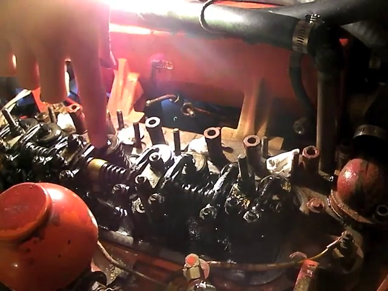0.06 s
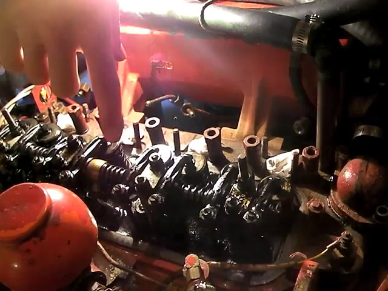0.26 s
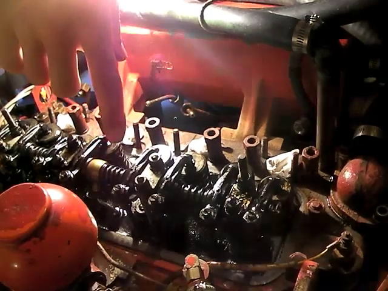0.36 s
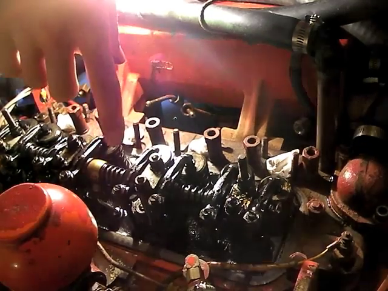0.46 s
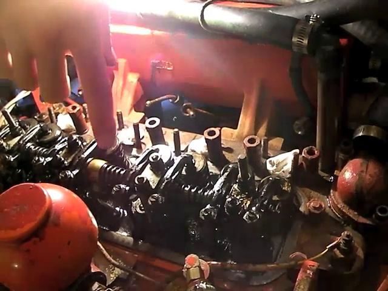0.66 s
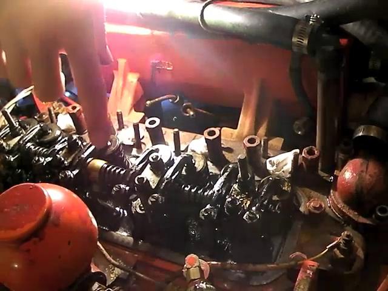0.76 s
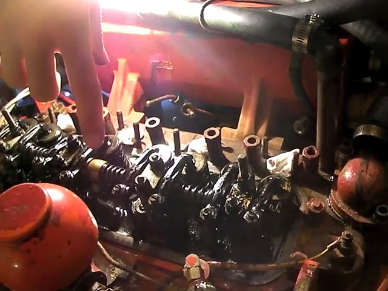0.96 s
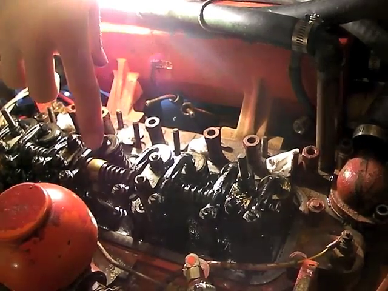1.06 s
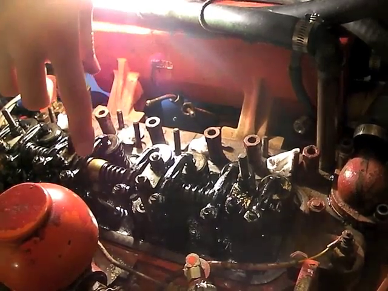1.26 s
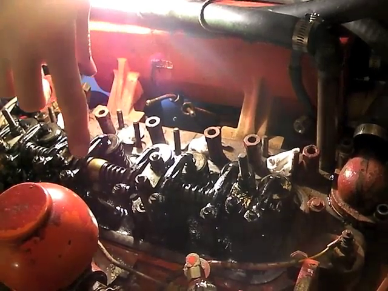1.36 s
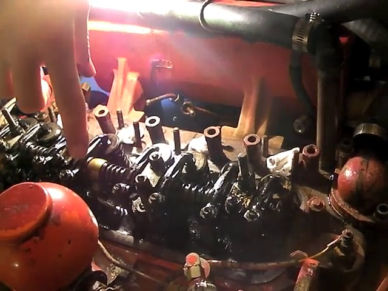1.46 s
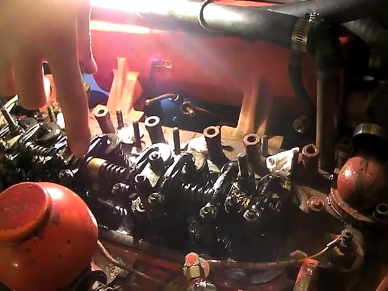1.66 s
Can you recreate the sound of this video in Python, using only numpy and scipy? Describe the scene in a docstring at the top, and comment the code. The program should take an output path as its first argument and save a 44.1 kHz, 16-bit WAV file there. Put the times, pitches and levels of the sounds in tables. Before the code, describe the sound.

A steel rocker arm clacks close by at about 0.2 seconds, then gives three loud, bright, quick pings between 0.3 and 0.5 seconds. It clacks back in a short cluster around 0.6 seconds, with a soft rub. Lighter clicks follow from 0.9 to 1.6 seconds, the clearest at 1.4, with a faint fluttering squeak near 1.5. The cramped engine space hums very faintly underneath.

```python
"""In the cramped engine space of a boat, a finger rocks a steel rocker arm on the stopped engine.
The arm clacks over onto the valve gear, pings three times against its stop, clacks back and is nudged
once more. Each contact rings the steel, and nearby iron and the room answer. The hand rubs, something
squeaks and the room hums faintly. A camera close by ducks and limits the loudest hits."""
import sys
import numpy as np
from scipy import signal
from scipy.fft import rfft, irfft, next_fast_len
from scipy.io import wavfile
from scipy.ndimage import uniform_filter1d, minimum_filter1d, map_coordinates

SR = 44100
rng = np.random.default_rng(int(sys.argv[2]) if len(sys.argv) > 2 else 0)


def materialize(psi):
    """Save the field psi as 16-bit PCM at rate SR to the path in sys.argv[1].

    A 1-D psi becomes a single channel; in a 2-D psi each row is a channel.
    """
    bounded = np.clip(np.atleast_2d(psi).T, -1, 1)
    quanta = np.round(bounded * 32767).astype(np.int16)
    wavfile.write(sys.argv[1], SR, quanta)


N = 74970
TIME = np.arange(N) / SR
HIT_SAMPLES = 10240
HIT_TIME, HIT_HZ = np.arange(HIT_SAMPLES) / SR, np.fft.rfftfreq(HIT_SAMPLES, 1 / SR)


def pings(strike_db=33, ring_db=3, snap_db=-3, snap_t60_s=0.012):
    """The arm snaps against its stop and rings high."""
    # light, bright contacts: start_s, level_db, low_db, upper_db, ring_db, bite_db
    contacts = [(.3361, -2, -0.5, 2, 2.5, -29.5), (0.4197, -2, -5.5, -1, -0.5, -20.5),
                (0.5164, -1.5, 0.5, 5, -3, -18.5)]
    # the arm's resonances: centre_hz, width_hz, level_db
    arm_modes = [(3680, 220, -19), (5000, 400, -29), (6630, 260, -15), (7080, 250, -20), (9480, 380, 3),
                 (9900, 300, -7), (10820, 350, -11), (11900, 400, -26), (14620, 280, -10)]
    # the broad crack under them: frequency_hz, level_db
    crack = [(60, -51), (1500, -45.5), (2300, -43), (3200, -34), (4400, -30), (7000, -22.5), (9000, -36),
             (13000, -25), (15000, -34.5)]
    # the arm's lasting partials: pitch_hz, level_db, t60_s
    arm_ring = [(6640, -42, .18), (9235, -29, .18), (9297, -29, .18), (9407, -23, .18), (9573, -24, .18),
                (9706, -25, .17), (9922, -29, .18), (10838, -36, .18)]
    # its quickly damped partials: pitch_hz, level_db, t60_s
    arm_bite = [(3170, 7.5, 0.0052), (3690, 5, 0.017), (5350, -11.5, .02)]
    upper_band = np.clip((HIT_HZ - 10000) / 700, 0, 1)
    out = np.zeros((2, N))
    for start_s, level_db, low_db, upper_db, ring_trim_db, bite_db in contacts:
        tilt_db = low_db * (0.5 - above(HIT_HZ, 4600)) + upper_db * upper_band
        colour = body(arm_modes, crack) * amp(tilt_db)
        strike = amp(strike_db) * irfft(engine_space(rise_s=.0002, direct_db=-5) * causal(colour))
        sustain = amp(ring_db + ring_trim_db) * ring(arm_ring)
        burst = rng.standard_normal((2, HIT_SAMPLES)) * amp(snap_db - 60 * HIT_TIME / snap_t60_s)
        snap = irfft(rfft(burst) * causal(above(HIT_HZ, 8000)))
        bite = amp(bite_db) * ring(arm_bite)
        add(out, start_s, amp(level_db) * (strike + sustain + snap + bite))
    return out


def clacks(strike_db=29, ring_db=7, bite_db=6):
    """The arm lands on the valve gear and shakes the whole cylinder head."""
    # heavy contacts: start_s, level_db, thud_db, treble_db, main_hz, low_hz, low_db, bite_db, rise_s
    contacts = [(.2320, -9.5, -7, -2.5, 7136, 1060, 13, -14, 0.001),
                (.2982, -39.5, -6, 19, 7100, 1030, 11, -24, 0.00033),
                (.314, -37.5, -4.5, 9.5, 7560, 1020, 2, -15, 0.0013),
                (0.5788, -16, -3, -10, 6900, 930, -25, -11.5, 0.0012),
                (0.6069, -8.5, 1.5, 4, 6690, 737, 2, 1, 0.0018),
                (0.6605, -22.5, 5.5, -7, 6940, 1120, 3.5, -4, .002),
                (0.836, -37, -24, -28.5, 6980, 760, -3, -38, 0.00036),
                (0.944, -52, 10.5, -19, 3970, 758, -1.5, 2, 0.0011),
                (1.2282, -42.5, -10.5, -4.5, 3980, 900, 6, 0, 0.00066),
                (1.268, -39.5, 8.5, 1.5, 7050, 1520, 2, -24, .0003),
                (1.3987, -26.5, -5, -2, 7030, 1200, 6.5, -31, 0.00021),
                (1.4028, -20, -16, -6, 6990, 1200, 1, -42.5, 0.00025),
                (1.44, -47, 16, -9.5, 3580, 1200, 3, 2.5, 0.00081),
                (1.5958, -64, 25.5, -2, 3030, 780, 13, -8, 0.00094)]
    # resonances of valve gear and head: centre_hz, width_hz, level_db
    head_modes = [(1450, 150, -12), (2540, 240, -4), (3250, 350, -9), (3950, 280, -1), (5150, 300, -6),
                  (9450, 700, -1), (10850, 350, 1), (12400, 600, -12), (14700, 400, -5)]
    # the broad crack under them: frequency_hz, level_db
    crack = [(50, -50.5), (200, -42.5), (500, -16.5), (1000, -30.5), (1700, -10), (3000, -19), (6300, -8.5),
             (9000, -17.5), (12000, -29), (15000, -15)]
    # the head's lasting partials: pitch_hz, level_db, t60_s
    head_ring = [(756.4, -42, 0.36), (1046, -41.5, 0.28), (1445, -40, 0.23), (2417, -48, 0.171),
                 (3860, -45, .2), (4040, -41, 0.12), (4210, -34.5, .2), (5170, -29.5, .08),
                 (6630, -32.5, 0.075)]
    # dull steel-on-steel bite at the instant of contact: pitch_hz, level_db, t60_s
    steel_bite = [(2517, -13.5, 0.039), (3100, -7, 0.024), (3350, -4, 0.012), (3710, -5.5, 0.018)]
    top_band = np.clip((HIT_HZ - 11000) / 2000, 0, 1)
    out = np.zeros((2, N))
    for start_s, level_db, thud_db, treble_db, main_hz, low_hz, low_db, bite_trim_db, rise_s in contacts:
        modes = list(head_modes) + [(main_hz, 240, 9), (low_hz, 170, low_db - 13.5)]
        tilt_db = thud_db * (1 - above(HIT_HZ, 2200)) + treble_db * above(HIT_HZ, 8500)
        dull_db = 0.226 * max(level_db + 7.5, -25) * top_band  # weaker blows lose top treble
        colour = body(modes, crack) * amp(tilt_db + dull_db)
        strike = amp(strike_db) * irfft(engine_space(rise_s, direct_db=-13.5) * causal(colour))
        sustain = amp(ring_db + thud_db) * ring(head_ring)
        bite = amp(bite_db + bite_trim_db) * ring(steel_bite)
        add(out, start_s, amp(level_db) * (strike + sustain + bite))
    return out


def body(modes, crack):
    """The gain curve of struck steel: steep-sided resonances over a broad crack."""
    peak_power = sum(amp(db) ** 2 / (1 + ((HIT_HZ - hz) / width) ** 2) ** 2 for hz, width, db in modes)
    return np.sqrt(peak_power + amp(along(crack, HIT_HZ)) ** 2)


def ring(partials, rise_s=0.00095):
    """Steel ringing out: two sets of the same decaying partials, with unrelated phases."""
    tones = sum(amp(db - 60 * HIT_TIME / t60) * np.sin(2 * np.pi * (hz * HIT_TIME + rng.random((2, 1))))
                for hz, db, t60 in partials)
    return tones * (1 - np.exp(-HIT_TIME / rise_s))


def engine_space(rise_s, direct_db, iron_hold_s=0.0017, iron_t60_s=0.032):
    """Mid and side spectra of a contact arriving direct, off nearby iron, then from the room."""
    # decay of the room's tail: frequency_hz, t60_s
    tail_t60 = [(200, 0.9), (800, 0.17), (3000, 0.14), (7000, 0.15), (10000, 0.13), (15000, 0.11)]
    # the tail's starting colour: frequency_hz, level_db
    tail_colour = [(200, -16.5), (900, -2.5), (3000, -5), (7000, -12), (10000, -7.5), (15000, -14.5)]
    iron_fade_db = -60 * np.maximum(HIT_TIME - iron_hold_s, 0) / iron_t60_s
    iron = rng.standard_normal((2, HIT_SAMPLES)) * amp(iron_fade_db)
    hz, t, bands = signal.stft(rng.standard_normal((2, HIT_SAMPLES)), SR, nperseg=256)
    tail_fade_db = along(tail_colour, hz)[:, None] - 60 * t / along(tail_t60, hz)[:, None]
    tail = signal.istft(bands * amp(tail_fade_db), SR, nperseg=256)[1][:, :HIT_SAMPLES]
    pair = (iron + tail) * (1 - np.exp(-HIT_TIME / rise_s))
    pair[0, 0] += amp(direct_db) * np.linalg.norm(pair[0])  # direct click, mid only
    power = uniform_filter1d(abs(rfft(pair)) ** 2, size=101, axis=1)
    return rfft(pair) * [causal(p ** -.5) for p in power]  # even out the overall colour


def rubs(grain_db=1.5):
    """Soft, grainy swells as the hand and oily steel slide."""
    # slides: centre_s, half_length_s, level_db, treble_db
    slides = [(0.027, 0.006, -53, -18), (0.087, 0.022, -63, -11), (0.213, 0.008, -49, 16),
              (0.571, 0.019, -34, 16), (0.766, 0.033, -53.5, 13.5), (0.998, 0.032, -53, 9.5),
              (1.254, 0.036, -52, 7.5), (1.626, 0.028, -52.5, 12)]
    # colour of the friction: frequency_hz, level_db
    colour = [(100, -42), (400, -0.5), (850, 5.5), (1500, -6), (4000, -12.5), (7000, -12), (10000, -11.5),
              (14500, -18.5)]
    out = np.zeros((2, N))
    for centre_s, half_s, level_db, treble_db in slides:
        swell = amp(level_db + grain_db * wobble(220)) * np.exp(-((TIME - centre_s) / half_s) ** 2 / 2)
        out += swell * noise(lambda hz: along(colour, hz) + treble_db * above(hz, 2700))
    return out


def squeak(jitter=.022, flutter_hz=56, flutter_depth=.55):
    """A faint, fluttering squeak around the last nudge."""
    # the squeak's contour: time_s, pitch_hz, level_db
    contour = [(1.30, 1180, -75), (1.35, 1200, -65.5), (1.42, 1170, -69), (1.50, 1215, -55.5),
               (1.56, 1195, -59.5), (1.60, 1230, -59.5), (1.63, 1220, -76.5)]
    time_s, pitch_hz, level_db = np.transpose(contour)
    pitch = np.interp(TIME, time_s, pitch_hz) * (1 + jitter * wobble(83))
    flutter = 1 + flutter_depth * sine(flutter_hz * (1 + .2 * wobble(22)))
    envelope = amp(np.interp(TIME, time_s, level_db, left=-120, right=-120))
    return envelope * flutter * np.sqrt(2) * sine(pitch)


def room_tone(air_db=-57.5, waver_hz=4, waver_db=2):
    """Still air with a faint, wavering hum."""
    # tones of the hum: pitch_hz, level_db
    tones = [(150, -75.5), (172, -76.5), (473, -70.5), (760, -79)]
    # colour of the air: frequency_hz, level_db
    air_colour = [(20, -16.5), (45, -15.5), (80, -6), (160, -2), (235, -14.5), (320, -4), (470, -5),
                  (700, -4), (1050, -11), (1400, -12), (2500, -14), (6500, -14), (9500, -14), (14500, -17)]
    hum = sum(amp(db + waver_db * wobble(27)) * np.sqrt(2) * sine(hz + waver_hz * wobble(5.8))
              for hz, db in tones)
    return amp(air_db) * noise(lambda hz: along(air_colour, hz)) + hum


def noise(colour_db):
    """Coloured stereo noise of rms 1, wider toward the treble."""
    # stereo image of the noise: frequency_hz, left_right_likeness
    likeness = [(100, .8), (700, 0.76), (1400, 0.65), (4000, .35), (9000, .05)]
    pair = filtered(rng.standard_normal((2, N)), lambda hz: amp(colour_db(hz)))
    stereo = spread(pair, likeness)
    return stereo / np.sqrt(np.mean(stereo ** 2) + 1e-20)


def amp(db):
    """Decibels to gain."""
    return 10 ** (np.asarray(db) / 20)


def along(points, hz):
    """A curve through (frequency_hz, value) points on a log axis."""
    frequencies, values = np.transpose(points)
    return np.interp(np.log(hz + 1), np.log(frequencies + 1), values)


def above(hz, edge_hz):
    """A smooth step from 0 to 1 around an edge."""
    return hz ** 4 / (hz ** 4 + edge_hz ** 4)


def wobble(knots_per_s):
    """A smooth random curve."""
    return map_coordinates(rng.standard_normal(1024), [TIME * knots_per_s], mode="mirror")


def sine(hz):
    """A sine that follows a frequency curve."""
    return np.sin(2 * np.pi * np.cumsum(hz) / SR)


def filtered(x, response):
    """Equalise x with a gain given as a function of frequency."""
    size = next_fast_len(x.shape[-1] + HIT_SAMPLES)
    return irfft(rfft(x, size) * response(np.fft.rfftfreq(size, 1 / SR)), size)[..., :x.shape[-1]]


def causal(gain):
    """Minimum-phase response for a gain curve, so nothing rings ahead of the hit."""
    cepstrum = irfft(np.log(np.maximum(gain, 1e-6)))
    cepstrum[1:HIT_SAMPLES // 2] *= 2
    cepstrum[HIT_SAMPLES // 2 + 1:] = 0
    return np.exp(rfft(cepstrum))


def spread(pair, likeness):
    """Mix two unrelated signals as mid and side into a left and right of the given likeness."""
    angle = lambda hz: np.arccos(np.clip(along(likeness, hz), -1, 1)) / 2
    mid, side = filtered(pair, lambda hz: np.array([np.cos(angle(hz)), np.sin(angle(hz))]))
    return np.array([mid + side, mid - side])


def add(out, start_s, hit):
    """Lay a hit into the mix."""
    start = round(start_s * SR)
    out[:, start:start + HIT_SAMPLES] += hit[:, :N - start]


def gain_control(x, knee_db=-4.5, duck_share=0.3, attack_s=0.0011, recover_db_per_s=32):
    """Loud peaks pull the gain down just after their first spike; it creeps back."""
    over_db = np.maximum(20 * np.log10(abs(x).max(0) + 1e-9) - knee_db, 0)
    recovery_db = recover_db_per_s * TIME
    duck_db = np.maximum.accumulate(duck_share * over_db + recovery_db) - recovery_db
    pole = np.exp(-1 / (attack_s * SR))
    return x * amp(-signal.lfilter([1 - pole], [1, -pole], duck_db))


def limiter(x, ceiling=.88, smooth_s=0.001):
    """Smoothly holds the highest peaks under the ceiling."""
    span = round(smooth_s * SR)
    gain = ceiling / np.maximum(abs(x).max(0), ceiling)
    return x * uniform_filter1d(minimum_filter1d(gain, 2 * span), span)


def scene():
    """The rocker arm up close, over the quiet room."""
    # stereo image of the hits: frequency_hz, left_right_likeness
    likeness = [(300, .88), (1500, .84), (3000, .74), (5000, .55), (7000, .4), (9500, .06), (14500, .32)]
    # their lean to the left: frequency_hz, left_db
    pan = [(500, -0.7), (3000, 0), (6800, 2), (9700, -1.1), (14000, 0.7)]
    steel = spread(pings() + clacks(), likeness)
    panned = filtered(steel, lambda hz: amp(along(pan, hz) * np.array([[1], [-1]])))
    return panned + rubs() + squeak() + room_tone()


def record(dry, notch_hz=7995, notch_width_hz=413, rolloff_hz=15000, cutoff_hz=16484):
    """The camera ducks and limits loud peaks, notches the treble deeply and cuts the top off steeply."""
    notch = lambda hz: np.maximum(above(abs(hz - notch_hz), notch_width_hz), amp(-42.5))
    high_cut = lambda hz: amp(-np.maximum(hz - rolloff_hz, 0) / 26) * (hz < cutoff_hz)
    return filtered(limiter(gain_control(dry)), lambda hz: notch(hz) * high_cut(hz))


dry = scene()
out = record(dry)
materialize(out)
```